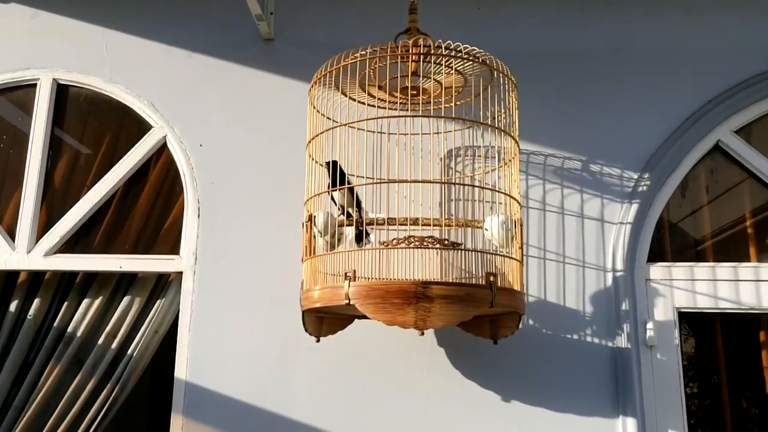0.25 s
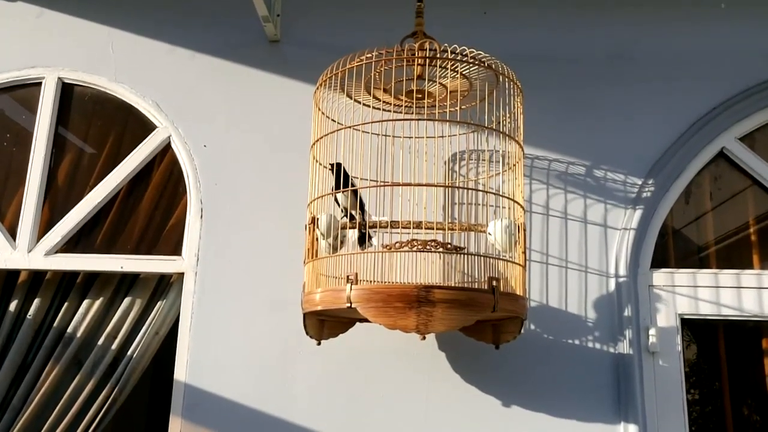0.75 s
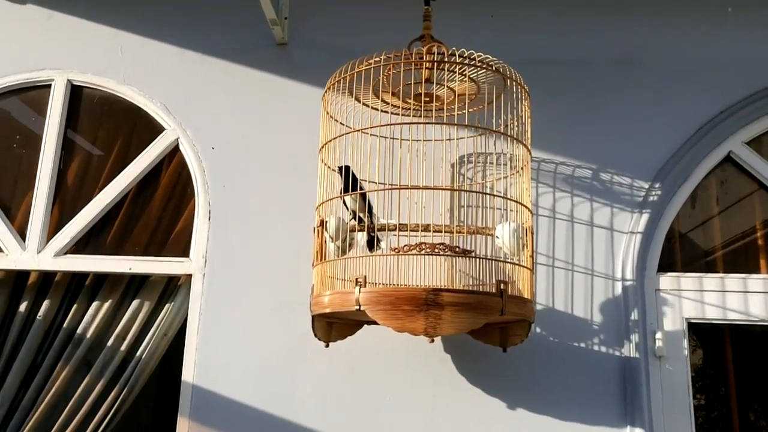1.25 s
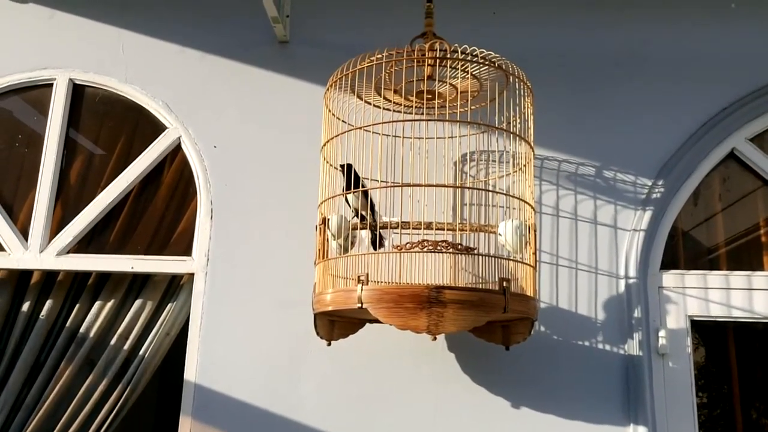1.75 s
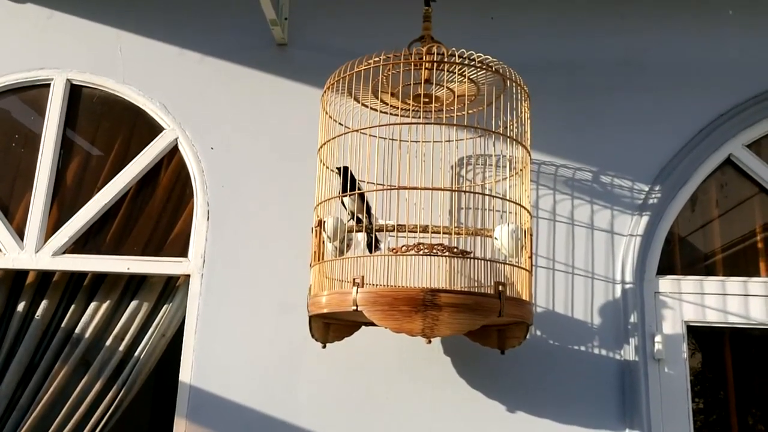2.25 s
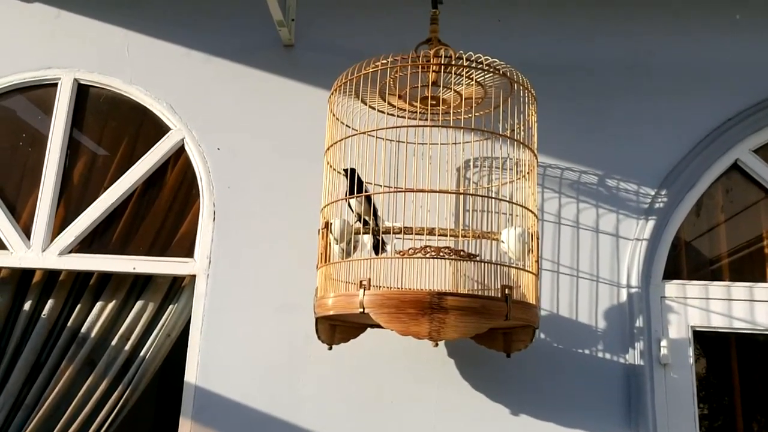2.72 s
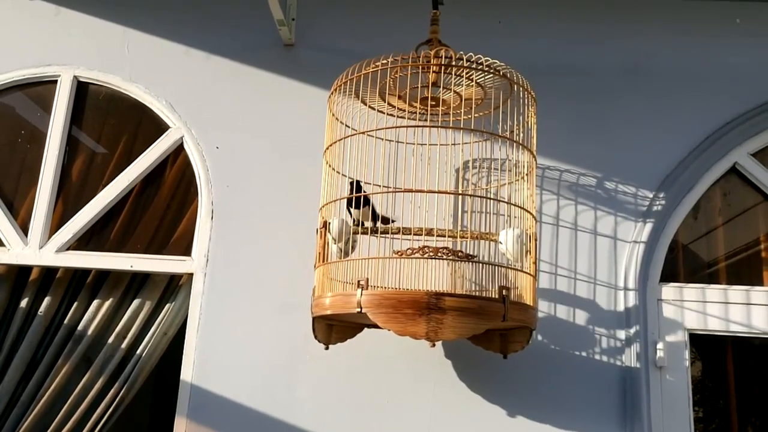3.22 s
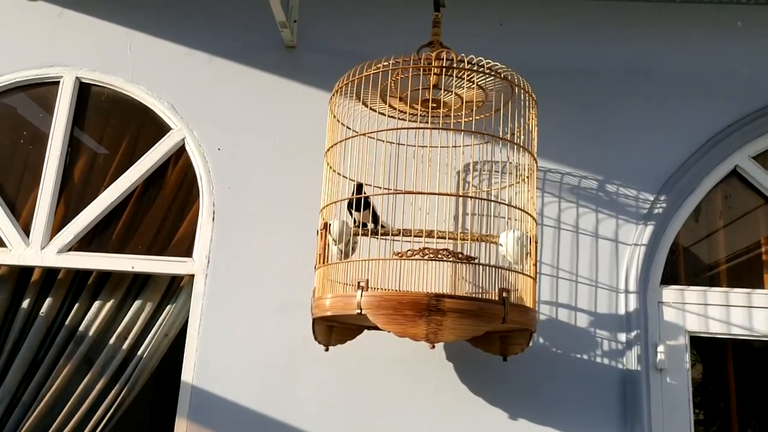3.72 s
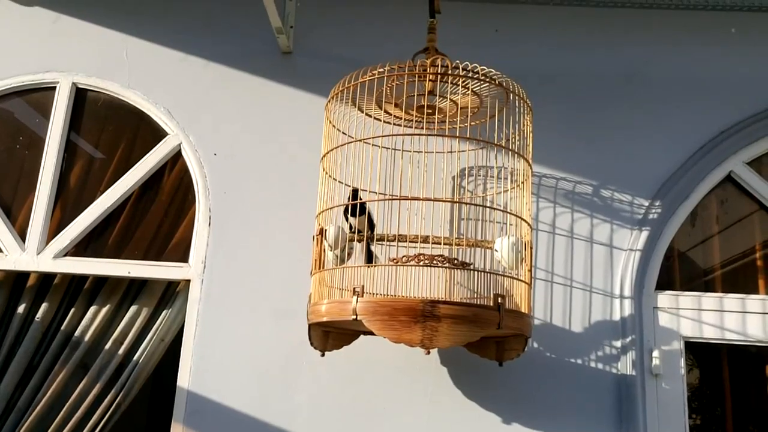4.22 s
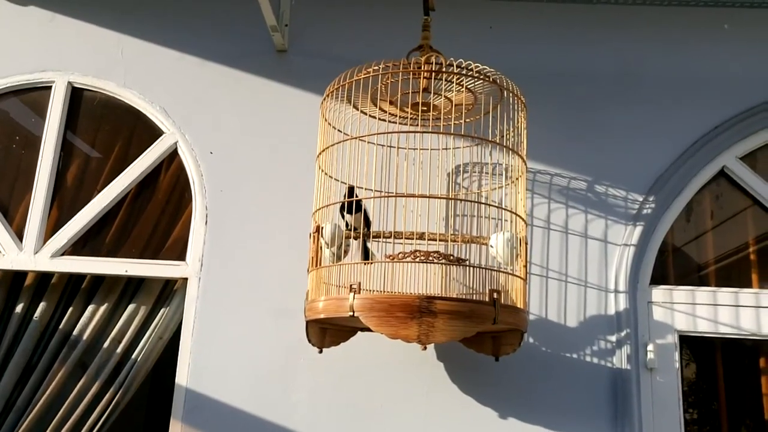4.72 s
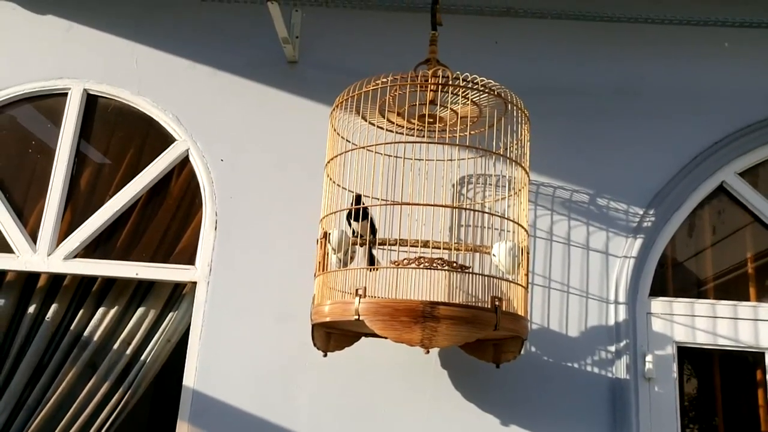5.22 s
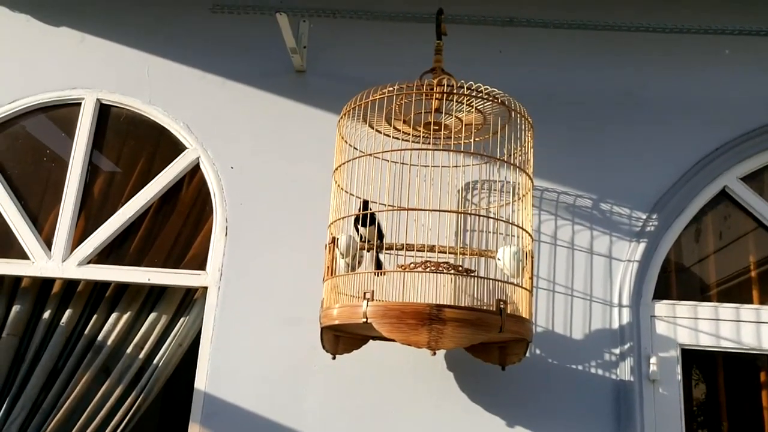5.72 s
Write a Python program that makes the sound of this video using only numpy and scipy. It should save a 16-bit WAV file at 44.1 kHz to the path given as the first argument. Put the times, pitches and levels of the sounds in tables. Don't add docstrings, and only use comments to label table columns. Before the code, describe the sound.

Outdoors by a house wall, softer neighbouring birds and a far rooster start the scene, then a nearby caged bird breaks in with piercing whistles and swoops. After a pause filled by distant warbling it gives a sharp chirp, a fast varied flourish, three ticks and one last chirp. Bright echoes follow each note; low traffic and insects hum beneath. The handheld microphone ducks and strains on the loudest notes.

```python
import sys
import numpy as np
from scipy import signal
from scipy.fft import rfft, irfft, next_fast_len
from scipy.io import wavfile
from scipy.ndimage import uniform_filter1d

SR = 44100
rng = np.random.default_rng(int(sys.argv[2]) if len(sys.argv) > 2 else 0)


def boost_factor(decibels):
    exponent = np.asarray(decibels, float) / 20
    return 10 ** exponent


def unload_audio(sound):
    columns = np.transpose(np.atleast_2d(sound))
    steps = np.round(np.clip(columns, -1, 1) * 32767)
    wavfile.write(sys.argv[1], SR, steps.astype(np.int16))


N = 263277


def evened(x):
    return x / np.sqrt(np.mean(x ** 2) + 1e-20)


def read(points, hz):
    f, value = np.transpose(points)
    return np.interp(np.log(hz + 1), np.log(f + 1), value)


def colour(x, points):
    size = next_fast_len(N + 4096)
    gain = boost_factor(read(points, np.fft.rfftfreq(size, 1 / SR)))
    return irfft(rfft(x, size) * gain, size)[..., :N]


def wander(count, span):
    noise = rng.standard_normal(count)
    smooth = uniform_filter1d(noise, size=span)
    return evened(uniform_filter1d(smooth, size=span))


# pitch_hz, time to fade by 60 dB t60_s
YARD_RING = [(500, 0.52), (2000, 1), (4000, 1), (6000, 1), (7500, 0.91)]


def tail(start_s, early_db, early_t60, stretch=1.0):
    taps = np.zeros((2, SR))
    at = np.arange(0, SR - 20, 20) + rng.integers(0, 20, (2, SR // 20 - 1))
    np.put_along_axis(taps, at, rng.choice([-1., 1.], at.shape), 1)
    hz, t, z = signal.stft(taps, SR, nperseg=256)
    t60 = stretch * read(YARD_RING, hz)[:, None]
    taps = signal.istft(z * boost_factor(-60 * t / t60), SR, nperseg=256)[1][:, :SR]
    t = np.arange(SR) / SR
    burst = boost_factor(early_db - 60 * t / early_t60)
    taps = taps * (1 + burst) * np.clip((t - start_s) / 0.0013, 0, 1)
    return taps / np.linalg.norm(taps[0])


def through(x, echoes):
    return signal.fftconvolve(x, echoes, axes=1)[:, :N]


# pitch_hz, level_db per Hz
HUM_COLOUR = [(12, -44.5), (20, -20), (143, -2), (300, -15.5), (479, -17), (1250, -26), (2000, -23),
              (2200, -27), (2890, -25), (3600, -20.5), (4180, -23), (4500, -32), (5090, -34), (6190, -28),
              (7180, -44), (9330, -76), (15800, -120)]
# pitch_hz, likeness (1 same, -1 opposite)
HUM_LIKENESS = [(60, 1), (150, 0.9), (400, 0.7), (1020, -0.076), (2620, -0.76), (6730, -0.76)]


def hum():
    frames, hz = N // 256 + 5, np.fft.rfftfreq(1024, 1 / SR)
    a, b, c, d, patches = rng.standard_normal((frames, 513, 5)).T
    patches = uniform_filter1d(patches, size=10, axis=0)
    patches = evened(uniform_filter1d(patches, size=20, axis=1))
    same = np.clip(read(HUM_LIKENESS, hz), -1, 1)[:, None]
    left, other = a + 1j * b, c + 1j * d
    z = np.array([left, same * left + np.sqrt(1 - same ** 2) * other])
    swell_db = 2.4 * wander(frames, span=25)
    z *= boost_factor(read(HUM_COLOUR, hz)[:, None] + 0.6 * patches + swell_db)
    noise = signal.istft(z, nperseg=1024, noverlap=768)[1][:, :N]
    return boost_factor(-46.5) * evened(noise) * boost_factor([[.6], [-.6]])


# start_s, length_s, pitch_hz, effort level_db, hoarseness (0-1)
CROW_SYLLABLES = [
    (-.09, .1, 617.5, -46.5, .95),
    (0.061, 0.683, 774.5, -35.5, .85),
    (0.969, 0.16, 652.3, -38, .95),
    (1.164, 0.43, 744.4, -36, .15),
    (1.514, 0.13, 642.6, -43.5, .35),
]
# pitch_hz, level_db
BEAK_COLOUR = [(450, -24), (630, 2), (800, -2), (980, -11), (1200, -5.5), (1550, -4.5), (2100, -7),
               (2600, -19.5), (4500, -21), (7000, -24.5)]


def rooster():
    rise_s, fall_s, edge_db, swell_db = .05, 0.031, -16, 0.5
    start, length, *columns = np.transpose(CROW_SYLLABLES)
    t = np.arange(N) / SR
    now = np.clip(np.searchsorted(start, t) - 1, 0, None)
    hz, effort_db, hoarse = (uniform_filter1d(c[now], size=3500) for c in columns)

    since, left = t[:, None] - start, start + length - t[:, None]
    open_share = np.clip(np.minimum(since / rise_s, left / fall_s + 1), 0, 1).max(1)
    progress = np.clip((t - start[now]) / length[now] - .5, -.5, .5)
    effort_db = effort_db + edge_db * (1 - open_share) + swell_db * progress

    hoarse = np.clip(hoarse, 0, 1)
    turns = np.cumsum(hz * (1 + .1 * hoarse * wander(N, span=200))) / SR
    full = sum(np.cos(2 * np.pi * k * turns) * (1 if k < 3 else hoarse) for k in range(1, 10))
    halves = sum(np.cos(2 * np.pi * (k - .5) * turns) for k in range(1, 10))
    rasp = (0.7 + np.exp(-(turns % 1) / 0.55)) * rng.standard_normal(N)
    voice = evened(colour(full + hoarse * (1.27 * hoarse * halves + 0.52 * rasp), BEAK_COLOUR))

    level_db = effort_db + 2.64 * hoarse * wander(N, span=900)
    voice = voice * boost_factor(level_db) * (open_share > 0) * boost_factor([[-.6], [.6]])
    echo = through(voice, tail(0.0056, early_db=3.5, early_t60=0.14, stretch=0.96))
    return boost_factor(-4.0) * voice + boost_factor(-0.5) * echo


VOICE_KINDS = {"pure": (.003, 0), "chirp": (.022, .015), "airy": (.009, 0), "husky": (.035, 0),
               "buzz": (.04, .07), "trill": (.012, .045)}
# multiple of the pitch, level_db
WHISTLE_OVERTONES = [(2, -14.5), (3, -29.5), (4, -31.5)]


def whistle(notes, turn, overtone_db):
    trill_hz = 77.75
    out = np.zeros((2, N))
    wobble = wander(N, span=120)
    fuzzy = .8 + .6 * wander(N, span=70)
    for kind, rows in notes:
        flutter, trill = VOICE_KINDS[kind]
        s, hz, level_db = np.transpose(rows)
        at = np.arange(round(s[0] * SR), min(round(s[-1] * SR), N))
        t = at / SR
        log_hz = np.interp(t, s, np.log(hz))
        hz = np.exp(uniform_filter1d(log_hz, size=1 + len(t) // 16, mode="nearest"))
        trilling = trill * signal.sawtooth(2 * np.pi * trill_hz * t, .3)
        turns = np.cumsum(hz * (1 + flutter * wobble[at] + trilling)) / SR
        tone = np.sin(2 * np.pi * turns)
        for k, db in WHISTLE_OVERTONES:
            overtone = np.sin(2 * np.pi * k * turns) * (k * hz < SR / 2)
            tone += fuzzy[at] * boost_factor(db + overtone_db) * overtone
        edges = np.clip(np.minimum(t - s[0], s[-1] - t) / 0.0013, 0, 1)
        out[0, at] += tone * boost_factor(np.interp(t, s, level_db)) * edges
    out[1] = out[0] * boost_factor(-np.interp(np.arange(N) / SR, *np.transpose(turn)))
    return out


def glides(kind, events, peak_at, travelled, start_db, end_db):
    notes = []
    for s, length, first_hz, last_hz, db in events:
        peak_hz = first_hz + travelled * (last_hz - first_hz)
        notes.append((kind, [(s, first_hz, db + start_db),
                             (s + peak_at * length, peak_hz, db),
                             (s + length, last_hz, db + end_db)]))
    return notes


# time_s, pitch_hz, level_db
NEAR_CALL = [(.413, 2847, -17.5), (.435, 2957, -11.5), (.455, 3012, -13.5), (.475, 2946, -15),
             (.52, 2926, -14), (.56, 2858, -20), (.575, 2880, -19), (.612, 2670, -30)]
# time_s, pitch_hz, level_db
NEAR_WARBLES = [
    [(2.41, 3180, -56), (2.46, 3220, -46), (2.51, 3050, -39.5), (2.55, 2500, -40), (2.6, 2130, -36),
     (2.66, 2250, -41), (2.72, 2320, -38.5)],
    [(2.72, 2320, -41), (2.76, 2750, -41.5), (2.8, 2920, -42.5), (2.84, 2600, -35.5), (2.88, 2150, -38),
     (2.91, 1950, -48.5)],
    [(3.5, 2750, -58), (3.55, 2950, -50), (3.585, 2850, -33), (3.62, 2450, -39.5), (3.655, 2100, -51.5),
     (3.68, 1850, -40), (3.73, 1800, -42.5)],
]
# start_s, length_s, first pitch_hz, last pitch_hz, peak level_db
NEAR_SHORT_NOTES = [(.355, .035, 3060, 3060, -38), (.91, .11, 2610, 2590, -41),
                    (2.24, .07, 2050, 2900, -36), (2.92, .11, 1850, 2100, -41),
                    (3.03, .055, 2100, 2650, -34.5), (3.17, .12, 3100, 3020, -38)]
NEAR_HUSKY_NOTES = [(.395, 0.0093, 2907, 2900, -30), (3.301, .17, 2665, 2214, -35.5)]
FAR_CLEAR_NOTES = [(.47, .23, 3290, 3300, -34), (.63, .17, 3680, 3620, -37), (2.7, .28, 2950, 3280, -35),
                   (2.93, .12, 3650, 3600, -36), (4.44, .2, 3110, 3120, -50), (4.78, .24, 3560, 3560, -48),
                   (5.05, .2, 3540, 3590, -53), (5.22, .12, 3600, 3820, -50), (4.92, .38, 4080, 4030, -54),
                   (5.7, .19, 4950, 5100, -46), (5.56, .17, 4680, 4780, -46)]
FAR_HUSKY_NOTES = [(.12, .11, 2950, 4150, -39), (.23, .13, 4150, 4180, -39), (1.2, .16, 4250, 3050, -38),
                   (1.35, .13, 3050, 2950, -36), (2.33, .2, 6150, 6320, -48), (2.43, .29, 3150, 4300, -37),
                   (2.54, .16, 4500, 4380, -42), (2.65, .12, 6200, 6000, -51), (2.77, .23, 6050, 6420, -50),
                   (3.68, .12, 3450, 2750, -35), (3.8, .13, 3050, 3400, -38), (3.86, .22, 4750, 5050, -42),
                   (5.3, .3, 3900, 3860, -45), (5.54, .2, 5300, 5050, -47), (.001, .1, 4400, 4340, -44),
                   (.001, .09, 3500, 3200, -48), (.001, .08, 5600, 5500, -46), (5.58, .34, 2190, 2240, -54),
                   (5.6, .3, 1100, 1118, -56)]


def other_birds():
    near = [("pure", note) for note in [NEAR_CALL] + NEAR_WARBLES]
    near += glides("pure", NEAR_SHORT_NOTES, peak_at=0.76, travelled=0.5, start_db=-8.5, end_db=-12.5)
    near += glides("husky", NEAR_HUSKY_NOTES, peak_at=.65, travelled=0.42, start_db=-10.5, end_db=-8)
    far = glides("airy", FAR_CLEAR_NOTES, peak_at=.45, travelled=0.79, start_db=-2, end_db=-4.5)
    far += glides("husky", FAR_HUSKY_NOTES, peak_at=.4, travelled=.5, start_db=-1.5, end_db=-8)

    near = whistle(near, [(.7, 7.5), (.9, 0.5)], overtone_db=-17.5)
    near = near + boost_factor(-0.5) * through(near, tail(0.0048, early_db=26.0, early_t60=0.11))
    far = whistle(far, [(0, .1), (6, .1)], overtone_db=-20.5)
    far = far * boost_factor(3.1 * wander(N, span=700))
    far_echo = through(far, tail(0.0059, early_db=0.5, early_t60=0.18, stretch=0.76))
    return near + boost_factor(-9) * far + far_echo


def sung(kind, shape, events):
    notes = []
    for s, stretch, share, db in events:
        rows = [(s + stretch * t, share * hz, db + level_db) for t, hz, level_db in shape]
        notes.append((kind, rows))
    return notes


# time from start_s, pitch_hz, level_db
CHIRP_SHAPE = [(0, 7000, -12), (.004, 6150, -1), (.008, 4543, -7), (.013, 4156, -6), (.022, 3798, -3.5),
               (.033, 3220, -9), (0.047, 2870, -12.5), (.063, 2230, -27)]
TICK_SHAPE = [(0, 7200, -15), (.006, 6306, 0.84), (.011, 5560, -1), (.016, 5520, -16)]
SWOOP_SHAPE = [(0, 6436, -6.5), (.011, 6160, 0.9), (0.033, 6024, 2), (.041, 4614, -4), (.046, 3400, -12),
               (.056, 2617, -17.5)]
# start_s, stretch, share of the pitch, level_db
CHIRP_TIMES = [(3.059, 0.89, 1.018, -0.5), (3.544, 0.72, 1.008, 0.5), (5.8957, 1.03, 1.004, -1.5)]
TICK_TIMES = [(4.486, .85, 1.028, -0.86), (4.622, 1.06, 0.98, -.1), (4.742, 1.01, 0.988, -.3)]
SWOOP_TIMES = [(1.015, .99, 1.002, -4), (1.6783, 1.1, .995, -8.5)]
# time_s, pitch_hz, level_db
HELD_WHISTLES = [
    [(.855, 6460, -5.5), (.875, 6363, -5.5), (.9, 6190, -12.5), (.93, 6142, -2), (.942, 6430, -29)],
    [(1.472, 6100, -10.5), (1.495, 6004, -12), (1.51, 6350, -11), (1.54, 6047, -2.5), (1.59, 6050, -9),
     (1.62, 6144, -29)],
]
# start_s, length_s, first pitch_hz, last pitch_hz, level_db at the turning point
RISING_NOTES = [(1.075, 0.059, 3300, 5280, -18), (1.77, .06, 3900, 5340, -20.5)]
LEAD_IN_NOTES = [(3.615, .026, 3824, 5180, -21.5), (4.13, .032, 4340, 5070, -28.5),
                 (4.23, .04, 3440, 3805, -17.5)]
ACCENT_NOTES = [(1.143, 0.042, 5253, 5760, -3), (1.834, 0.019, 5160, 5490, -7.5),
                (3.641, .028, 4900, 4523, -5), (4.162, 0.025, 4884, 5172, -10)]
GRACE_NOTES = [(0.807, .012, 6235, 5070, -22), (1.728, .042, 3962, 3620, -19),
               (4.198, 0.018, 2320, 3170, -25), (4.213, 0.0079, 3350, 3570, -15)]
TRILLED_NOTE = [(4.272, .102, 3700, 6180, -6.5)]
BUZZING_NOTE = [(.812, 0.044, 4245, 5830, -19)]


def repertoire():
    notes = sung("chirp", CHIRP_SHAPE, CHIRP_TIMES)
    notes += sung("pure", TICK_SHAPE, TICK_TIMES)
    notes += sung("pure", SWOOP_SHAPE, SWOOP_TIMES)
    notes += [("pure", note) for note in HELD_WHISTLES]
    notes += glides("chirp", RISING_NOTES, peak_at=0.67, travelled=0.54, start_db=-2, end_db=8.5)
    notes += glides("pure", LEAD_IN_NOTES, peak_at=0.64, travelled=0.446, start_db=-9.5, end_db=5.5)
    notes += glides("airy", ACCENT_NOTES, peak_at=0.33, travelled=0.895, start_db=-12, end_db=-15)
    notes += glides("husky", GRACE_NOTES, peak_at=0.37, travelled=0.54, start_db=4.5, end_db=-6)
    notes += glides("trill", TRILLED_NOTE, peak_at=.85, travelled=.75, start_db=-7.5, end_db=-7)
    notes += glides("buzz", BUZZING_NOTE, peak_at=0.75, travelled=0.87, start_db=-2, end_db=12)
    return notes


# time_s, left over right level_db
HEAD_TURN = [(.8, 12.5), (.9, 7.5), (1.9, 5.5), (3.0, 7.5), (4.2, 4), (4.48, 9.5), (4.8, 8.5), (5.9, 12)]
# delay_s, left gain, right gain
FIRST_ECHOES = [(.0035, .15, .2), (.0115, .75, .6), (.0165, -.5, .3), (.0205, .45, .3), (.026, .45, -.3)]
# pitch_hz, level_db
WALL_COLOUR = [(2000, 0.5), (3500, -5), (4500, -2.5), (5500, -0.5), (6500, -1), (9000, -6.5)]
# pitch_hz, level_db
PHONE_SHADOW = [(1500, -10.5), (3000, 5.5), (4500, 2.5), (6500, -10), (12000, -6)]


def songbird():
    song = whistle(repertoire(), HEAD_TURN, overtone_db=-5.0)
    echoes = boost_factor(1.77) * tail(0.007, early_db=27, early_t60=0.18)
    for delay_s, left, right in FIRST_ECHOES:
        echoes[:, round(delay_s * SR)] += left, right
    left, right = song + colour(through(song, echoes), WALL_COLOUR)
    return np.array([left, np.roll(colour(right, PHONE_SHADOW), shift=7)])


def scene():
    return hum() + rooster() + other_birds() + songbird()


def low_pass(x):
    return signal.sosfilt(signal.butter(12, 20000, fs=SR, output="sos"), x)


# pitch_hz, level_db
MICROPHONE_COLOUR = [(30, -8.5), (110, 0.35), (6800, -0.22), (7200, -1), (7700, -5), (9000, -6),
                     (12000, -11), (15500, -4), (16200, -45.5)]
# pitch_hz, level_db
OVERLOAD_SMOOTHING = [(7000, 0), (8500, -8), (15400, -8), (16000, -35)]


def record(dry):
    ceiling = .97
    x = colour(dry, MICROPHONE_COLOUR)
    power = abs(uniform_filter1d((x ** 2).max(0), size=300))
    power_db = 10 * np.log10(power + 1e-12)
    fall = np.arange(N) * 120.0 / SR
    held_db = np.maximum.accumulate(power_db + fall) - fall
    over_db = np.maximum(held_db + 12.0, 0)
    x = x / boost_factor(.25 * uniform_filter1d(over_db, size=200))
    x = colour(np.clip(x, -ceiling, ceiling), OVERLOAD_SMOOTHING)
    return low_pass(np.clip(x, -1, 1))


dry = scene()
out = record(dry)
unload_audio(out)
```